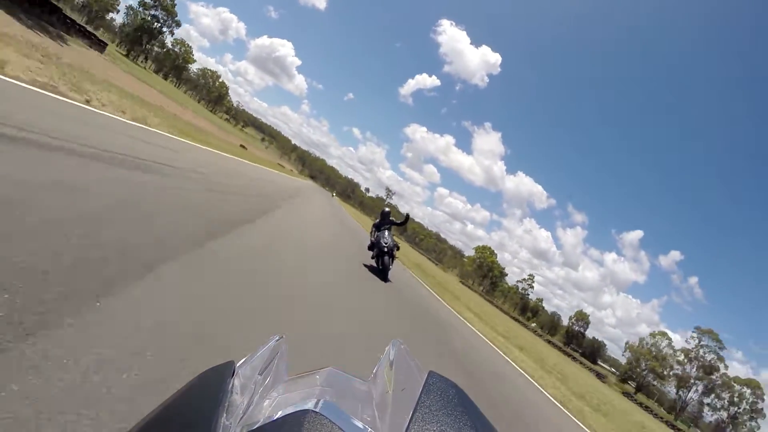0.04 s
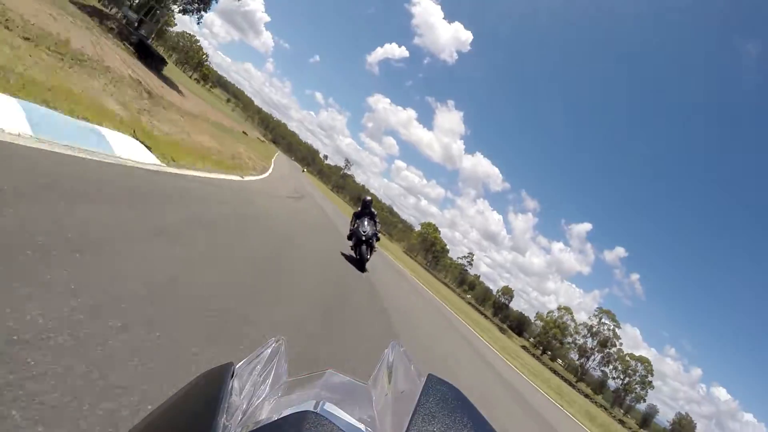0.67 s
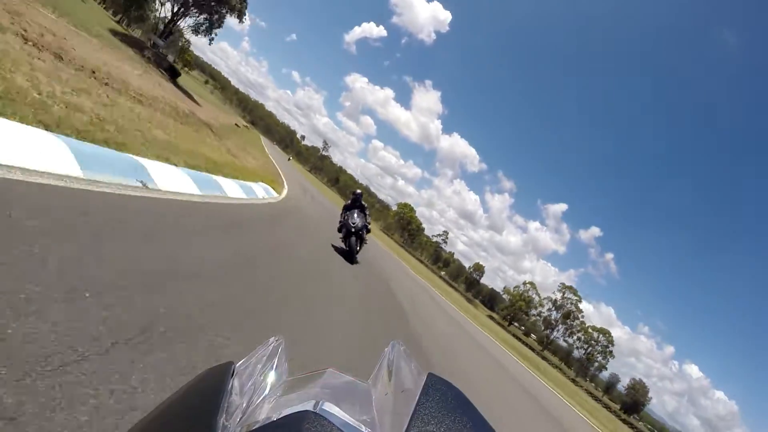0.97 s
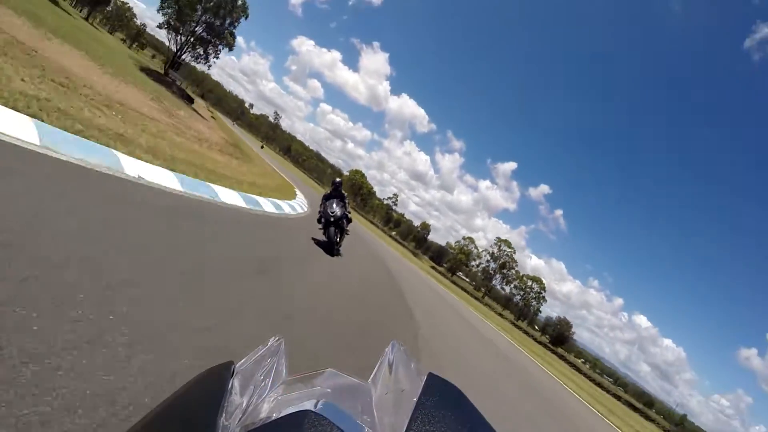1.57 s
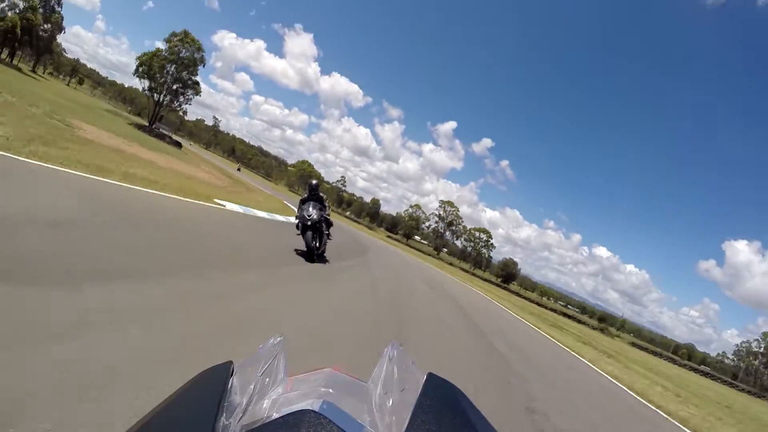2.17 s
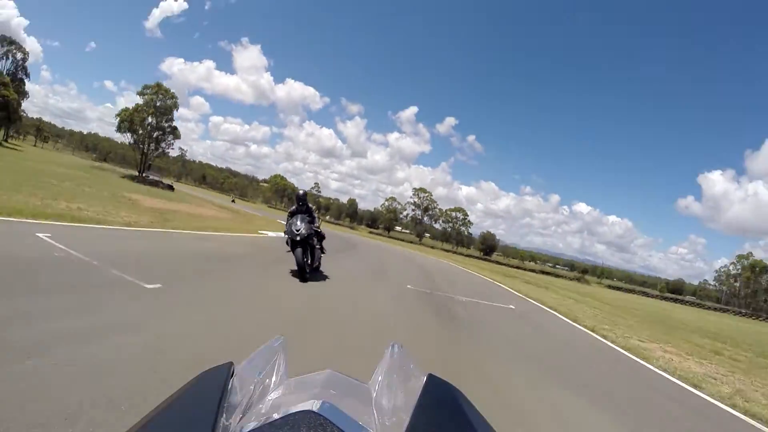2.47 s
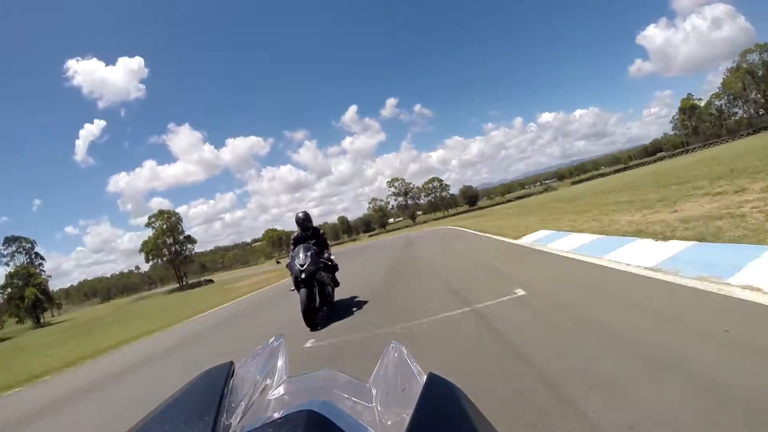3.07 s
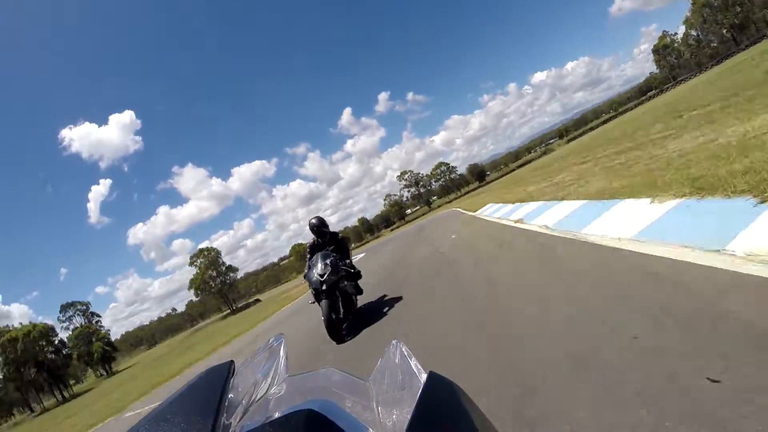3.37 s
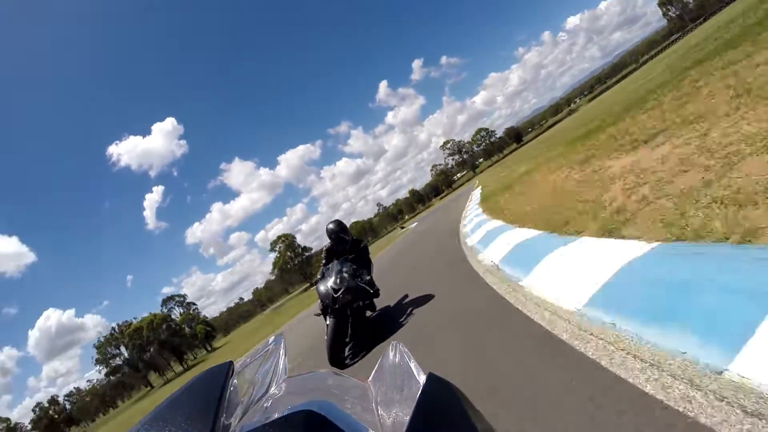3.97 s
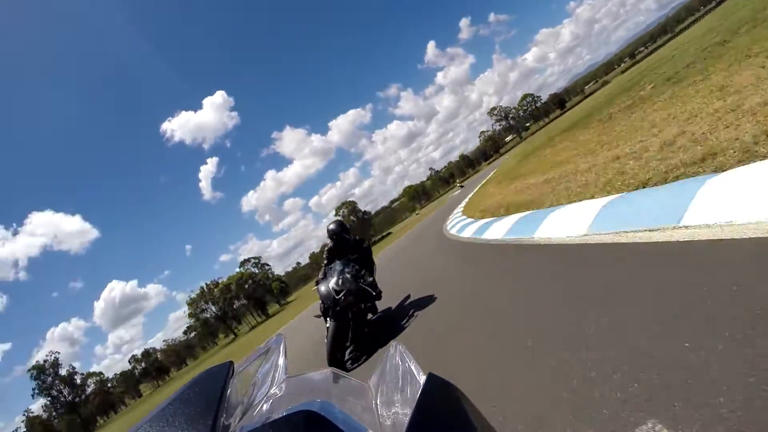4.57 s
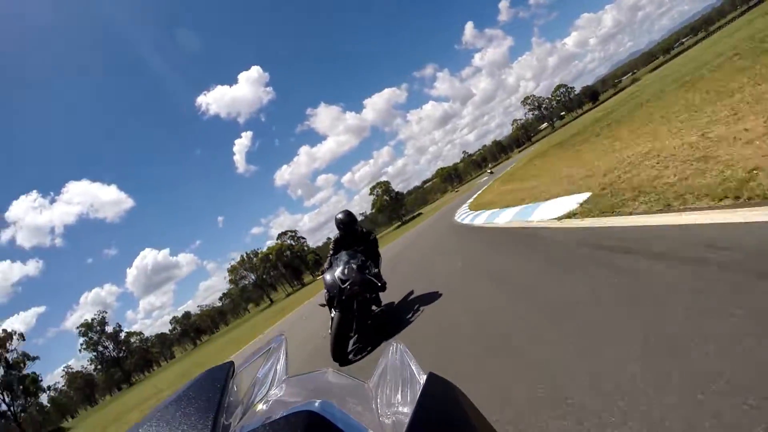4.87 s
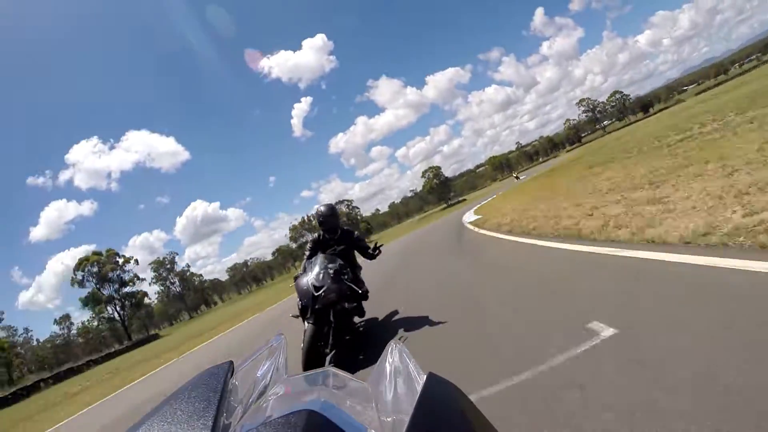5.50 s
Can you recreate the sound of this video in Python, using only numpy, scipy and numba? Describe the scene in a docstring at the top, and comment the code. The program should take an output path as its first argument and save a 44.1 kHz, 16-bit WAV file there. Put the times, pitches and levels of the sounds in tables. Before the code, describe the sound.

A four-cylinder sport motorcycle drones loudly up close in rushing wind, its revs slowly sinking as the throttle closes and the gears whine.

```python
"""A ride through two bends on a four-cylinder sport bike, its revs slowly sinking.
At first the airbox booms once per firing and the exhaust rasps, while wind rushes and thumps.
After about two seconds the throttle closes: the rasp fades and the slack engine clatters.
A second later the back wheel starts to drive the engine (the overrun), and the gears whine.
All along, wind and knocks ring the plastic case of a camera behind the screen; the top peaks clip."""
import sys
import numpy as np
from scipy import signal
from scipy.fft import rfft, irfft
from scipy.io import wavfile
from scipy.ndimage import uniform_filter1d
from numba import njit

SR = 44100
rng = np.random.default_rng(int(sys.argv[2]) if len(sys.argv) > 2 else 0)


def file_out(sig):
    """Save sig as 16-bit WAV at sys.argv[1]."""
    # one column per channel
    cols = np.atleast_2d(sig).T
    # limit, then scale
    lim = np.clip(cols, -1, 1)
    pcm = np.round(lim * 32767).astype(np.int16)
    wavfile.write(sys.argv[1], SR, pcm)


N = 248722


def airbox(hz, firings):
    """The air intake box booms once per firing, almost a pure tone; it is weaker above its tuning."""
    tuning_hz, fall_db_per_hz = 216.4, 0.65
    level_db = -10 - fall_db_per_hz * np.maximum(hz - tuning_hz, 0)
    flutter = 1 + 0.085 * wander(18)
    return undb(level_db) * np.sqrt(2) * np.sin(2 * np.pi * firings) * flutter


def exhaust(hz, firings, shut):
    """The exhaust rasps through the tailpipe, and softens as the throttle shuts and the revs sink."""
    # exhaust tones: (pitch [multiple of the firing rate], relative level [dB])
    tones = [(2, -8.5), (3, 2), (3.5, -7), (4, -3), (4.5, -4.5), (5, -0.5), (5.5, -6.5), (6, -8),
             (6.25, -10), (8, -5), (8.5, -6), (8.75, -9), (9, -10.5), (10, -8.5), (10.5, -5)]
    # pitches at which the tailpipe rings: (pitch [Hz], width [Hz], boost [dB])
    pipe_rings = [(404, 38, 10), (666, 23, 7), (770, 90, 5.5), (1100, 240, 6)]
    level_db = blend(-21, -34.5, shut) + 13 * np.log2(hz / hz[0])
    rasp = engine_tones(hz, tones, waver_db=2.5, twist=0.0035, rough=0.39, rings=pipe_rings)
    knocking = undb(-0.5) * knocks(firings, scatter=0.34, decay=0.46)
    return undb(level_db) * (rasp + knocking)


def engine_block(hz, firings, shut, overrun):
    """The engine clatters most while it is slack, neither driving the wheel nor driven by it."""
    # tones of the metal block: (pitch [multiple of the firing rate], relative level [dB])
    tones = [(2, -17.5), (3.5, -5.5), (3.75, -7), (4, 2.5), (6, -5), (6.25, -5), (7, 5), (7.5, 1.5),
             (7.75, -2.5), (9.5, -8.5), (11, -1.5), (12, -2), (13, -8)]
    pulling_db, slack_db, overrun_db = -30, -20.5, -24.5
    level_db = blend(blend(pulling_db, slack_db, shut), overrun_db, overrun)
    drone = engine_tones(hz, tones, waver_db=3.5, twist=0.0028, rough=0.33)
    knocking = undb(-4.5) * knocks(firings, scatter=0.74, decay=0.85)
    return undb(level_db) * (drone + knocking)


def gears(hz, overrun, coasting_s):
    """On the overrun the load moves to the back of the gear teeth, and their whine keeps growing."""
    # tones of meshing gears: (pitch [multiple of the firing rate], relative level [dB])
    tones = [(6.66, -2), (7.38, -1.5), (7.62, -10)]
    level_db = blend(-39, -25.5, overrun) + 1.8 * coasting_s
    whine = engine_tones(hz, tones, waver_db=2.5, twist=0.007, rough=0.28)
    fine_teeth = engine_tones(hz, [(38.6, 0)], waver_db=0, twist=0.008, rough=1.6)
    return undb(level_db) * (whine + undb(-54 + 4.5 * coasting_s) * fine_teeth)


def engine_tones(hz, tones, waver_db, twist, rough, rings=()):
    """Wavering tones that follow the crankshaft and swell as they pass a ringing pitch."""
    # the shaft twists a little, which smears the high tones
    firings = np.cumsum(hz) / SR + twist * wander(13)
    total = 0
    for multiple, db in tones:
        gain = undb(db + ring_db(rings, multiple * hz) + waver_db * wander(22))
        phase = 2 * np.pi * (multiple * firings + rng.random())
        total = total + gain * np.sin(phase + rough * wander(53))  # uneven strokes roughen the tone
    return unit(total)


def knocks(firings, scatter, decay):
    """Valves and pistons repeat a run of knocks every four firings, never quite the same."""
    points = 1024
    cycle = firings / 4 % 1
    pattern = np.interp(cycle * points, np.arange(points), rng.standard_normal(points))
    fade = np.exp(-(firings % 1) / decay)  # decay is counted in firings
    return colour(fade * (pattern + scatter * rng.standard_normal(N)), case_db)


def wind_rush(speed):
    """Fast air hisses on the camera case and rings it. Speed is 1 at the start."""
    level_db = -18 + np.log2(speed)
    hiss = rng.standard_normal(N) * undb(1.5 * wander(25))
    return undb(level_db) * colour(hiss, case_db)


def wind_thumps(t):
    """Big swirls of air thump the screen, harder on the way out of the first bend."""
    # rumble of swirls on the screen and camera mount: (pitch [Hz], relative level [dB])
    rumble_shape = [(10, -29.5), (22, -6), (37, 3.5), (52, -2), (70, -7), (98, 2), (135, -7), (200, -4),
                    (260, -7.5), (350, -18), (500, -31), (900, -80.5)]
    # sudden thumps of air: (time [s], length [s], boost [dB])
    gusts = [(0.08, .05, 9), (1.89, .05, 2.5), (2.193, 0.051, 4), (3.45, 0.017, 1.5), (4.369, 0.025, 6),
             (4.48, .04, 3.5)]
    level_db = blend(-22, -18.9, ramp(start_s=1.35, length_s=0.3))
    gust_db = sum(db * np.exp(-np.square((t - s) / length)) for s, length, db in gusts)
    rumble = colour(rng.standard_normal(N), lambda f: shape_db(rumble_shape, f))
    return undb(level_db + gust_db) * rumble


def whistle(t):
    """A faint, high whistle that dies away in the first bend."""
    fading_db = np.interp(t, [0, 1.3, 2.2, 5.64], [-72, -76.5, -88.5, -88.5])
    return undb(fading_db + 3 * wander(8)) * np.sin(2 * np.pi * 8770 * t + 1.1 * wander(25))


def case_db(f):
    """The camera's plastic case muffles the treble and rings at its own pitches."""
    # what gets through the case wall: (pitch [Hz], relative level [dB])
    wall = [(100, -23.5), (250, 4), (450, -2), (1000, -0.5), (1550, 0), (2350, -5.5), (2650, -14.5),
            (3200, -16), (3450, -23.5), (5300, -26.5), (6200, -40), (7700, -49.5), (11000, -60.5),
            (16000, -84.5)]
    # ringing pitches of the case, and one dip: (pitch [Hz], width [Hz], boost [dB])
    rings = [(643, 130, 5.5), (1264.4, 102, 10), (1370, 66, 8), (1720, 41, -9.5), (1934, 150, 5),
             (2176, 202, 8), (2830, 180, 3.5), (3033, 67, 8), (3212, 130, 5.5), (4130, 81, 7.5),
             (4686, 520, 8.5), (5430, 130, 3.5), (5910, 160, 8.5), (6730, 820, 5)]
    return shape_db(wall, f) + ring_db(rings, f)


def ring_db(rings, f):
    """The boost at pitch f: a bell-shaped bump around each ringing pitch."""
    return sum(db * 2 ** -np.square(2 * (f - hz) / width) for hz, width, db in rings)


def shape_db(points, f):
    """The level at pitch f, joining the points along a scale of octaves."""
    hz, db = np.transpose(points)
    return np.interp(np.log(f + 1), np.log(hz), db)


def colour(x, response_db):
    """Turn each pitch up or down, then scale to strength 1."""
    f = np.fft.rfftfreq(N, 1 / SR)
    return unit(irfft(rfft(x) * undb(response_db(f)), N))


def wander(hz):
    """A smooth random wobble of strength 1 that moves about hz times a second."""
    f = np.fft.rfftfreq(N, 1 / SR)
    return unit(irfft(rfft(rng.standard_normal(N)) / (1 + (f / hz) ** 4), N))


def ramp(start_s, length_s):
    """Rise from 0 to 1 and stay there."""
    return np.clip((np.arange(N) / SR - start_s) / length_s, 0, 1)


def blend(start, end, share):
    """Move from start to end as share goes from 0 to 1."""
    return start + (end - start) * share


def undb(db):
    """Turn decibels into a multiplier."""
    return 10 ** (np.asarray(db) / 20)


def unit(x):
    """Scale to an average strength (rms) of 1."""
    return x / np.sqrt(np.mean(x ** 2))


@njit
def peak_follower(x, attack, release):
    """A level that jumps up to each peak and sinks slowly."""
    envelope, level = np.empty(len(x)), 0.
    for i in range(len(x)):
        level += (abs(x[i]) - level) * (attack if abs(x[i]) > level else release)
        envelope[i] = level
    return envelope


def limiter(x, ceiling, attack_s, release_s):
    """A volume control that dips at loud peaks, a little too late to catch them."""
    envelope = peak_follower(x, 1 - np.exp(-1 / (attack_s * SR)), 1 - np.exp(-1 / (release_s * SR)))
    gain = np.minimum(1, ceiling / (envelope + 1e-9))
    return uniform_filter1d(uniform_filter1d(gain, size=128), size=32)


def scene():
    """Engine and wind at one microphone; the bike stays in one gear, so its speed follows the revs."""
    # engine speed: (time [s], firing rate [Hz])
    revs = [(0.04, 221.8), (0.35, 218.1), (0.57, 211.4), (1.49, 203.4), (1.6, 197.0), (1.89, 192.3),
            (2.19, 190.5), (2.33, 181.9), (2.55, 182.5), (2.66, 178.5), (3.3, 176.4), (3.44, 181.8),
            (4.2, 181.4), (4.75, 179), (5.0, 174.1), (5.64, 169.7)]
    t = np.arange(N) / SR
    hz = np.interp(t, *np.transpose(revs))
    firings = np.cumsum(hz) / SR  # how many so far
    shut = ramp(start_s=2.17, length_s=0.36)  # the throttle rolls closed
    overrun_start_s = 3.21
    overrun = ramp(overrun_start_s, length_s=0.4)
    coasting_s = np.maximum(t - overrun_start_s, 0)
    engine = airbox(hz, firings) + exhaust(hz, firings, shut)
    engine += engine_block(hz, firings, shut, overrun) + gears(hz, overrun, coasting_s)
    wind = wind_rush(speed=hz / hz[0]) + wind_thumps(t)
    return (engine + wind + whistle(t))[None]


def record(dry):
    """The camera turns loud peaks down, clips those that slip past and cuts the highest treble."""
    boosted = undb(0.8) * dry
    gain = limiter(boosted[0], ceiling=0.94, attack_s=0.00015, release_s=0.05)
    clipped = np.clip(boosted * gain, -1, 1)
    soft_ends = signal.windows.tukey(N, 0.001)
    treble_cut = signal.ellip(9, 0.1, 70, 16000, fs=SR, output="sos")
    return signal.sosfilt(treble_cut, clipped * soft_ends)


dry = scene()
out = record(dry)
file_out(out)
```